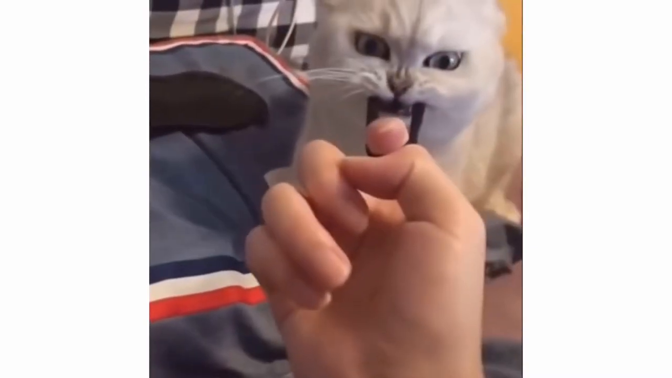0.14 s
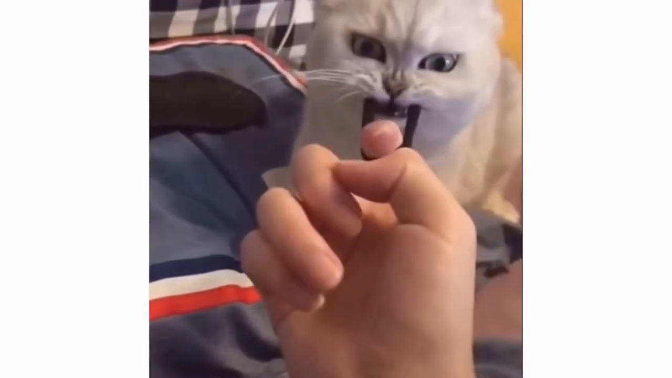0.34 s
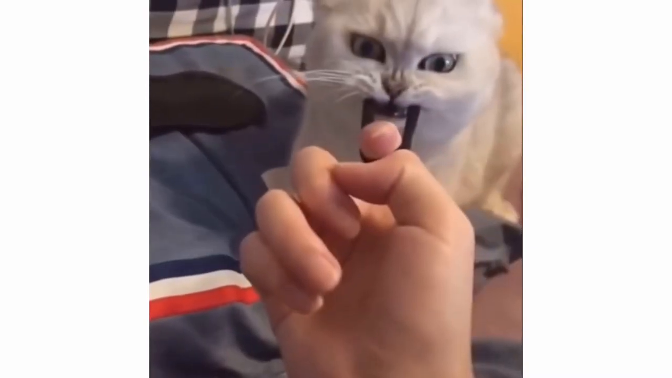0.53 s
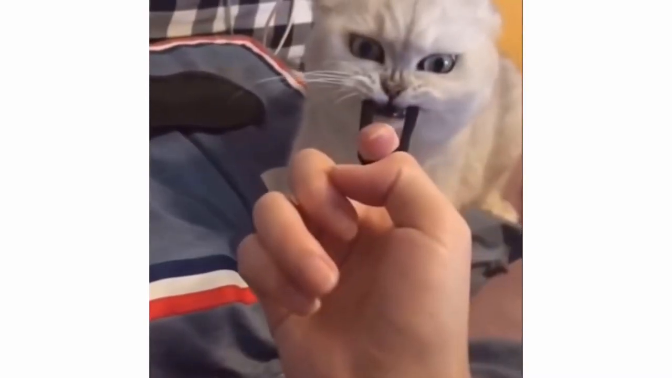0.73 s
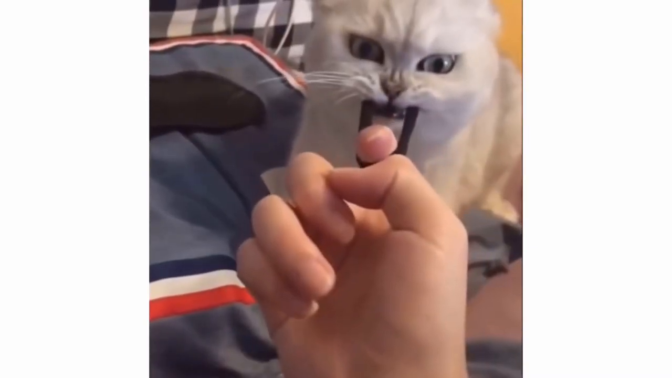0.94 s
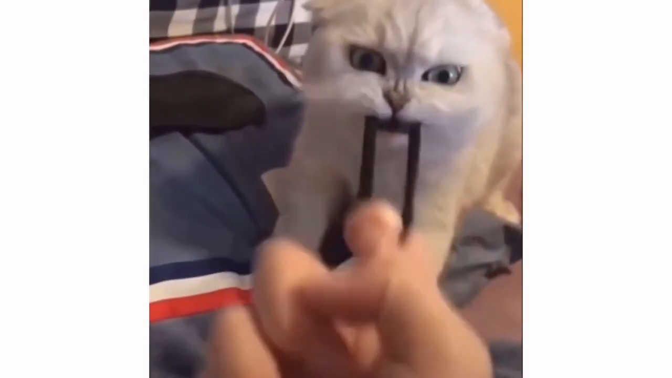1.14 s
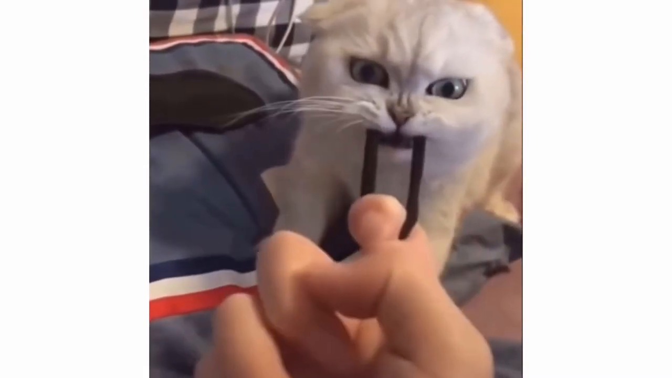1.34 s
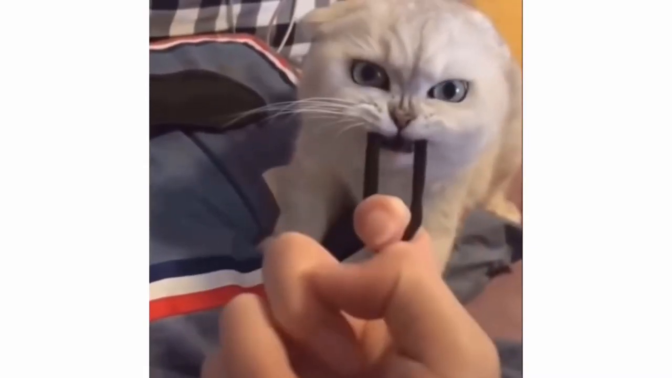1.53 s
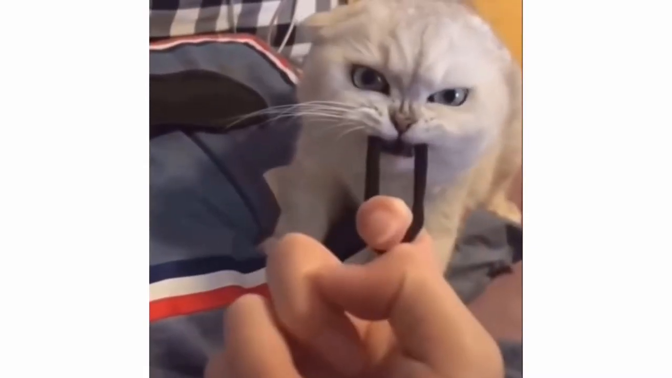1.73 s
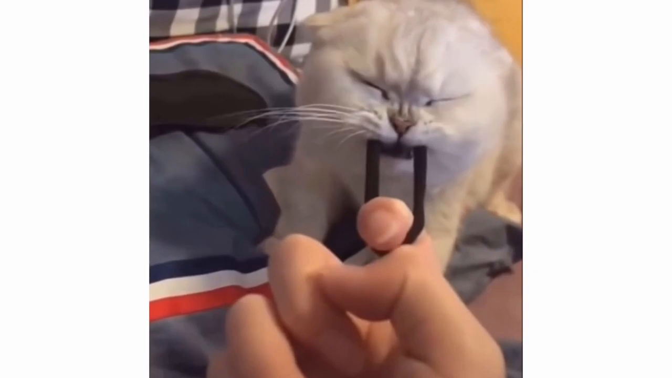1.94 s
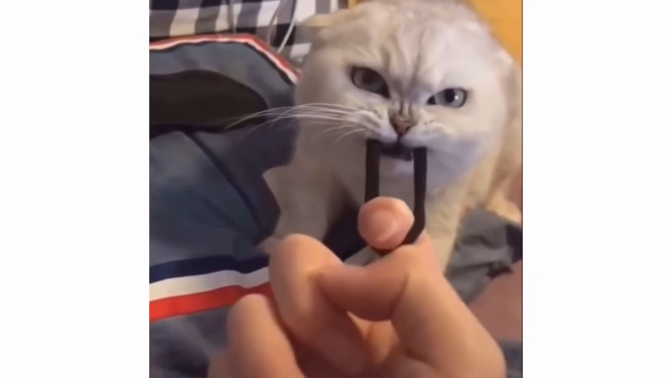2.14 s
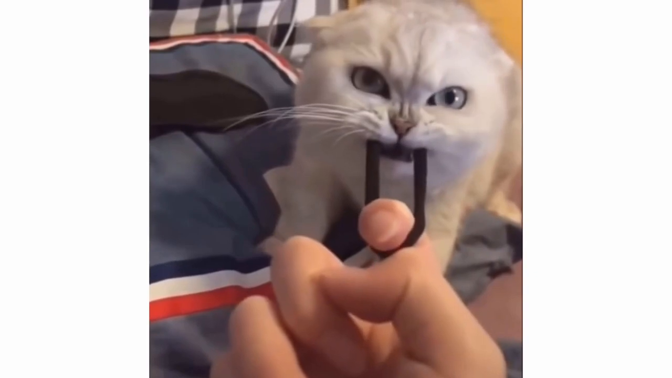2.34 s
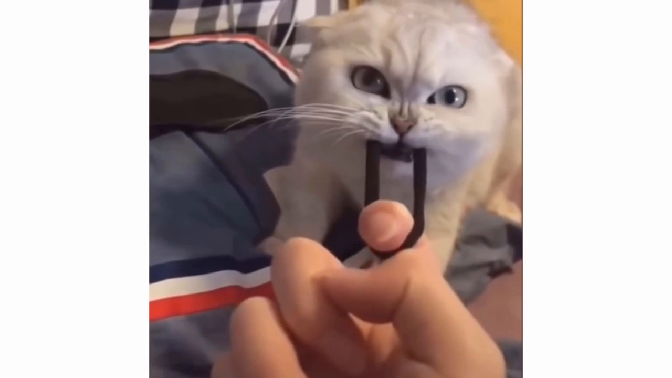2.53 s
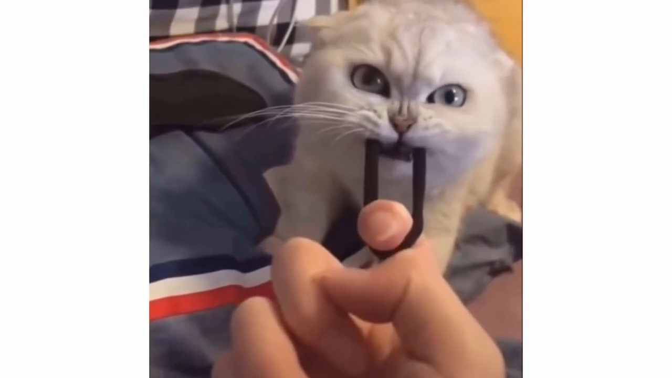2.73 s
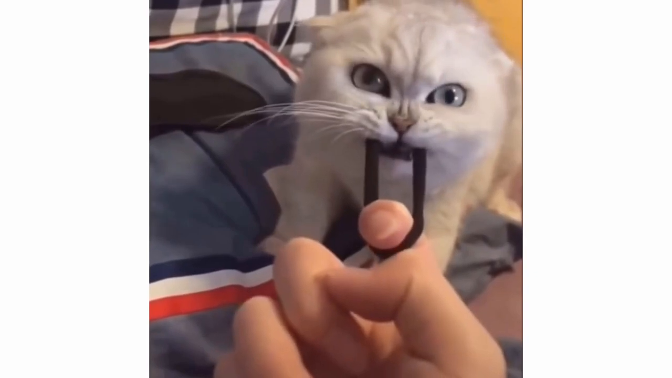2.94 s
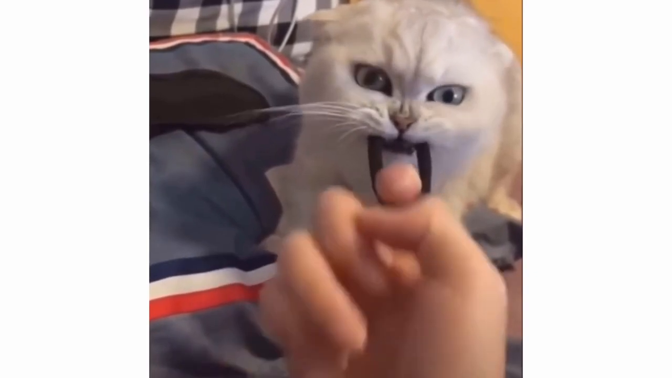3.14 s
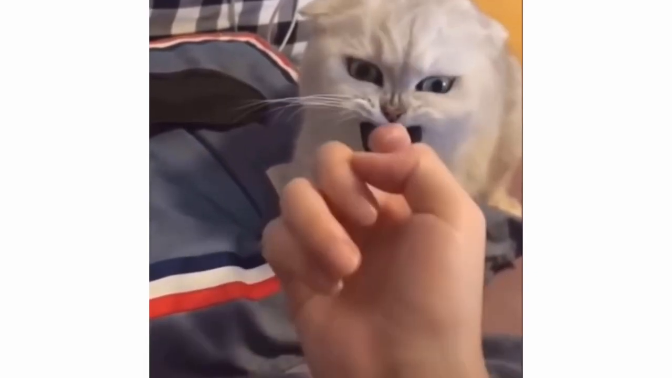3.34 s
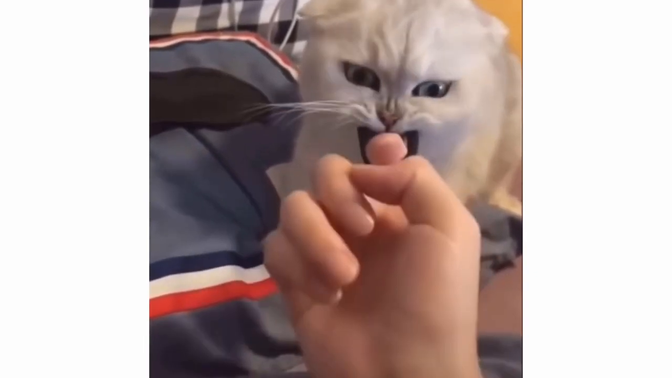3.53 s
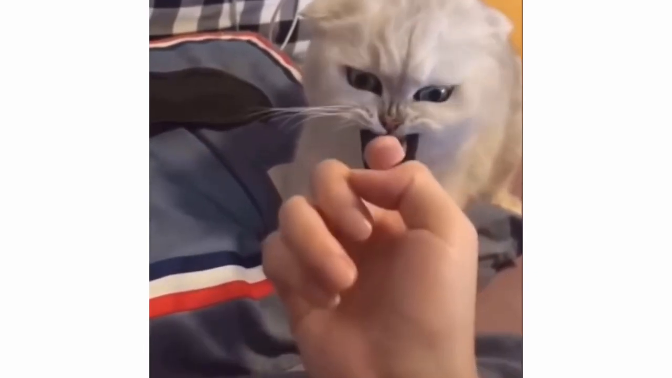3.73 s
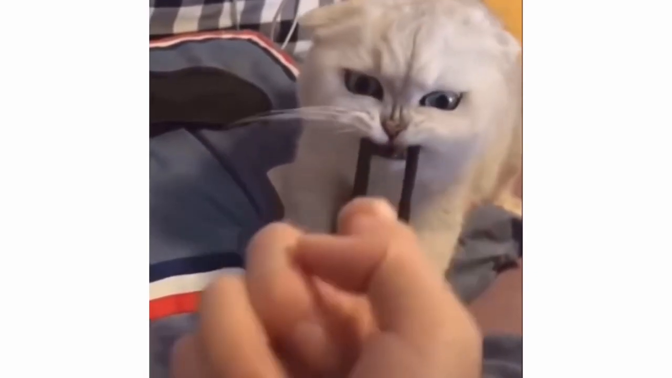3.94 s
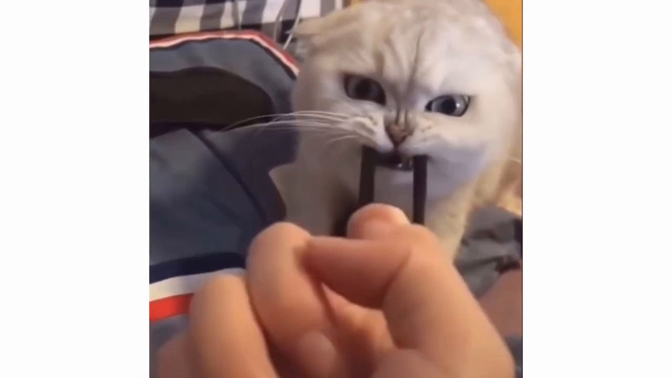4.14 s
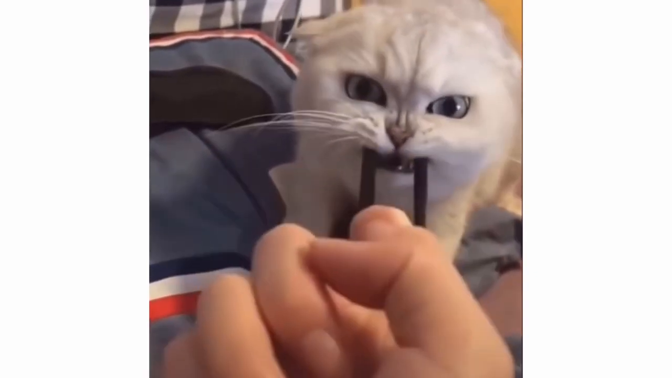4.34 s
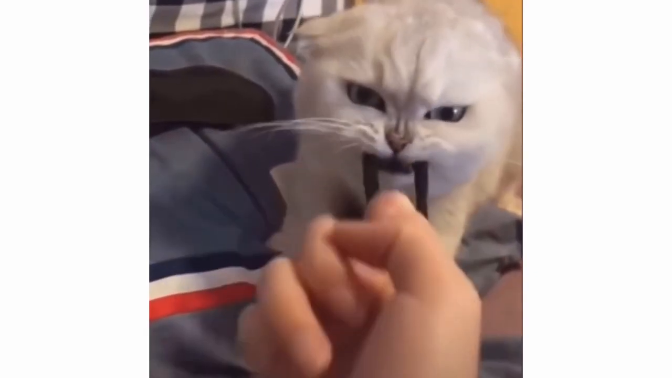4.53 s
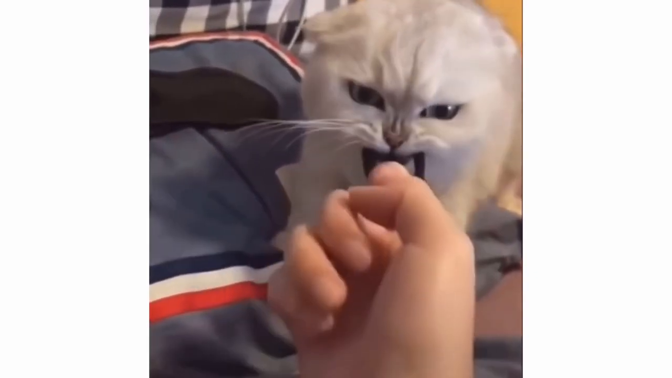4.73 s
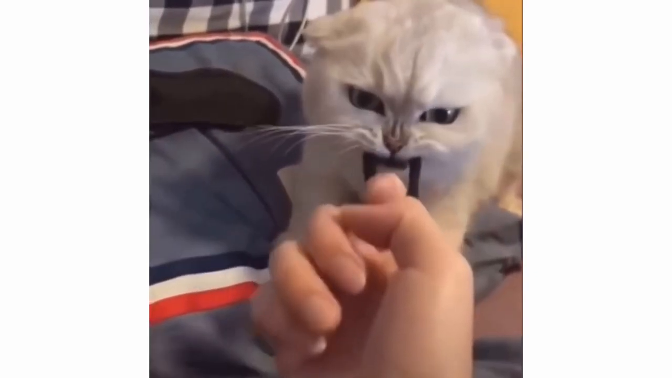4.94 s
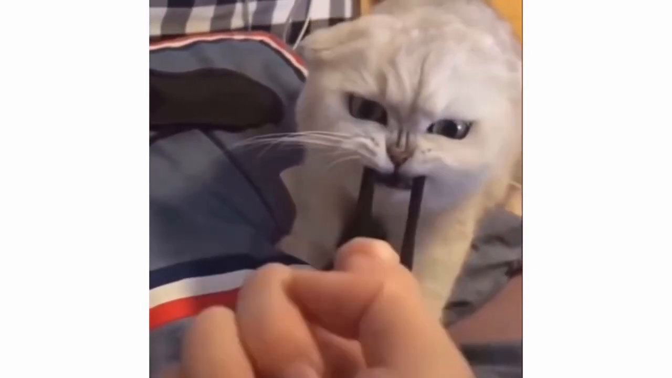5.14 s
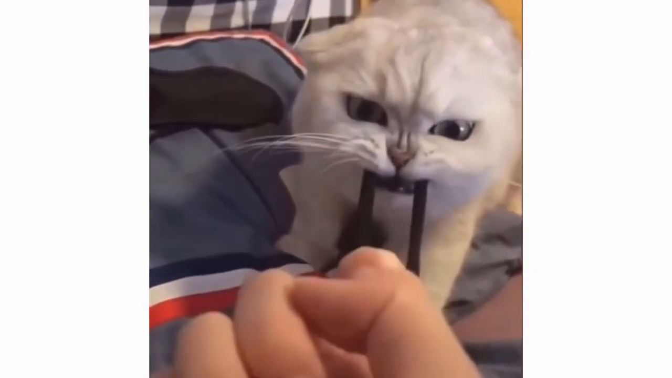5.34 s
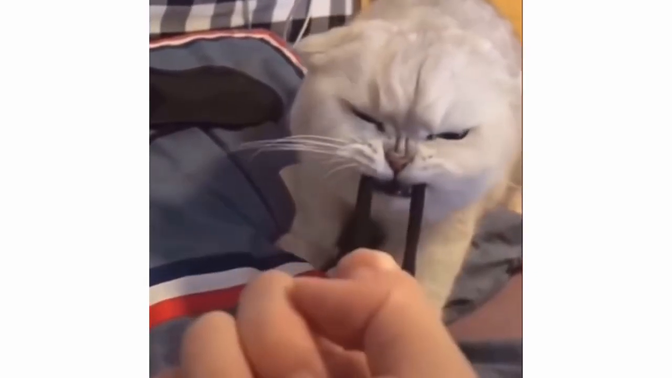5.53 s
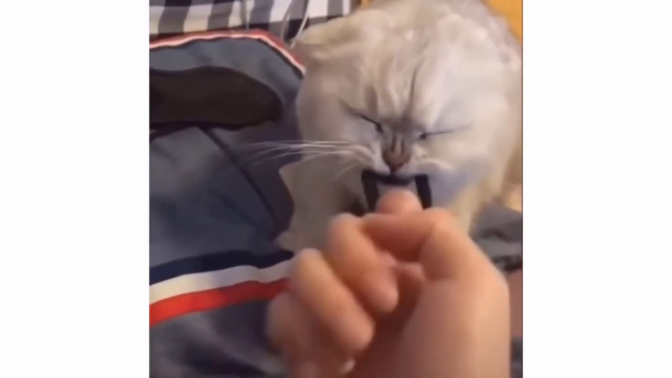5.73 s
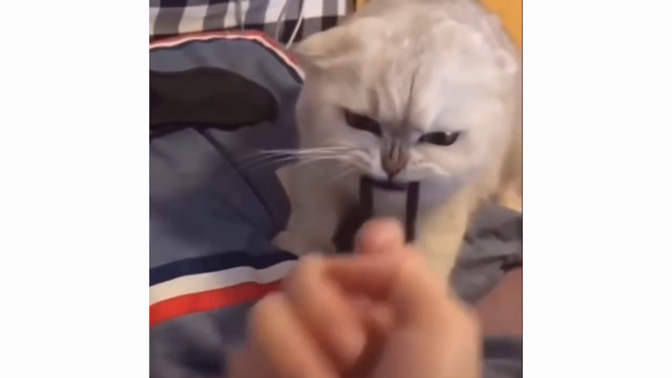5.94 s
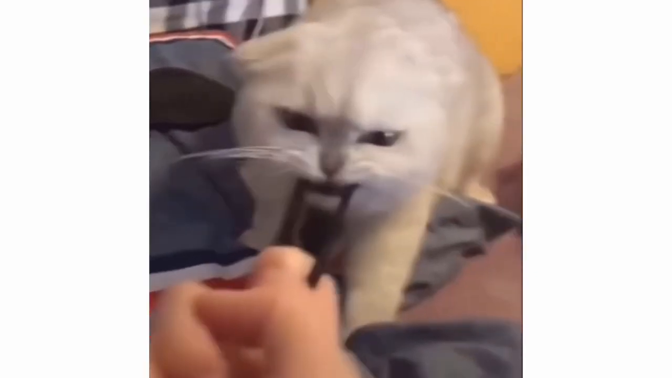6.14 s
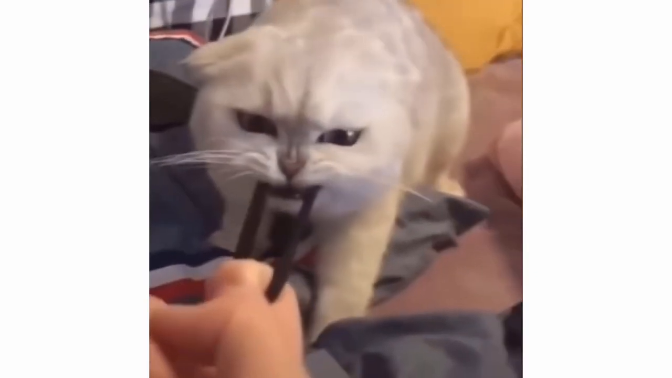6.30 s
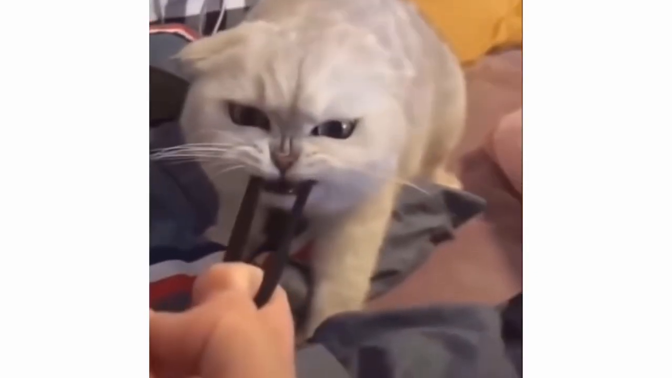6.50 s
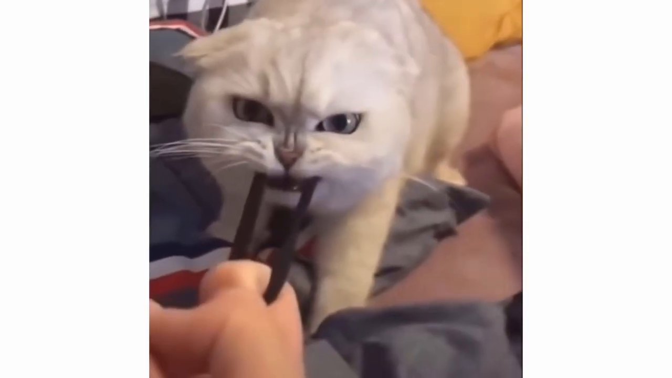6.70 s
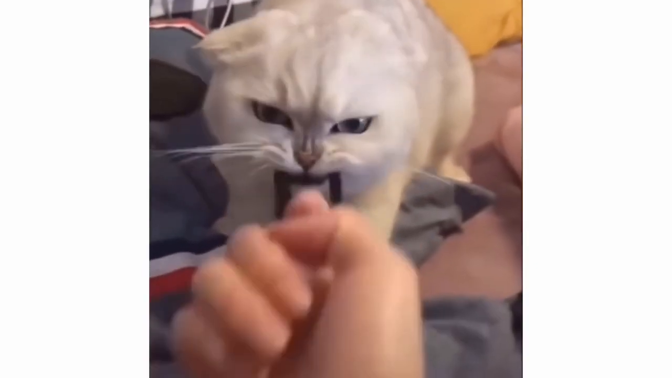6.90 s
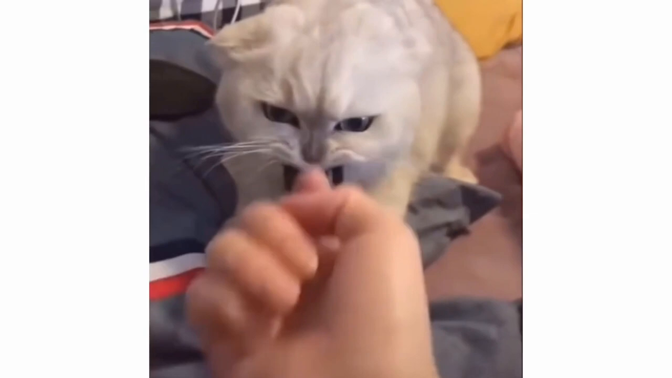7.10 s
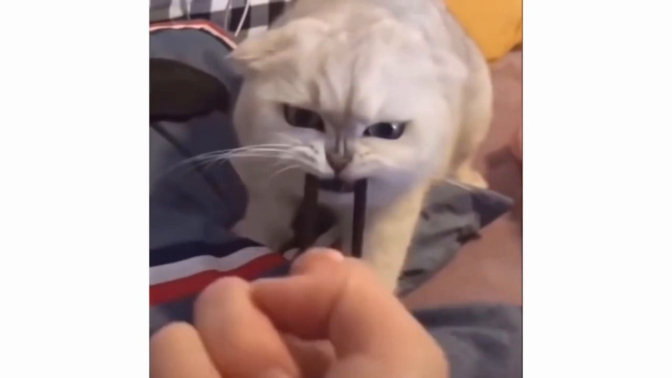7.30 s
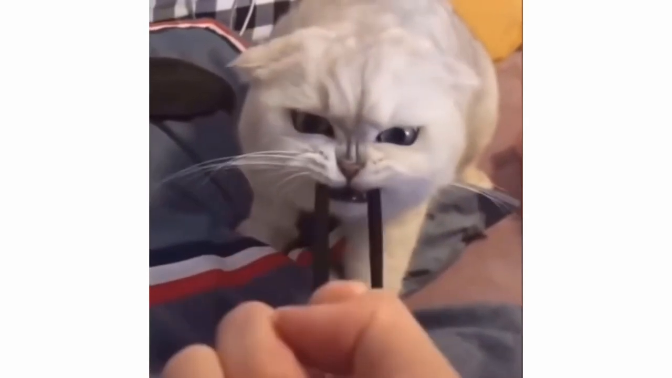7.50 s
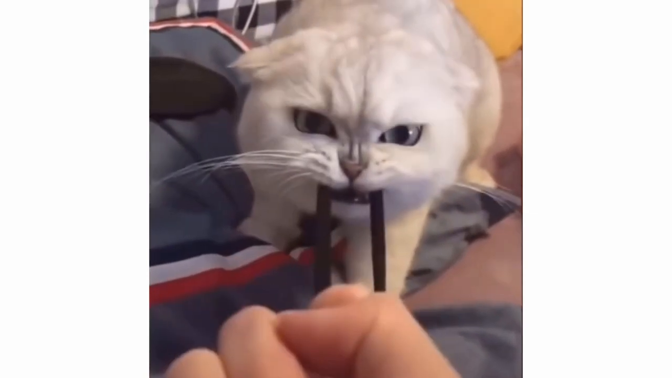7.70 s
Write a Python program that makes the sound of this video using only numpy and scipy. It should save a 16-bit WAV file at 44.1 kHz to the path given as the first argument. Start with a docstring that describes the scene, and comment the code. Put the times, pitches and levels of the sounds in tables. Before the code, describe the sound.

Indoors, a cat with a strap in its teeth gives a short fluttering yowl, then a long angry one sagging into a growl, amid cloth rustles.

```python
"""First cloth rustles over fur and faint whistles glide by, over a rumbling, hissing room: shaped noise and sines.
A cat with a strap between its teeth then gives a short fluttering yowl through a half-closed mouth, and after
a gap a long clear one that sags into a growl and recovers. The voice is a stack of partials coloured by throat,
lips and nose, and has breath noise; a separate high hiss near 12 kHz comes and goes during the yowls.
Rustles and soft thumps, both noise bursts, go with the tugs."""
import sys
import numpy as np
from scipy import signal
from scipy.fft import rfft, irfft, next_fast_len
from scipy.io import wavfile
from scipy.ndimage import map_coordinates

SR = 44100
rng = np.random.default_rng(int(sys.argv[2]) if len(sys.argv) > 2 else 0)


def how_loud(loudness_db):
    """Turn decibels into a plain amplitude multiplier (0 dB gives 1, 20 dB gives 10)."""
    steps = np.asarray(loudness_db, float) / 20
    return 10 ** steps


def output_pcm(signal):
    """Save a mono or channel-first signal as 16-bit PCM at the path in sys.argv[1].

    Samples are clipped to [-1, 1] before scaling.
    """
    pcm = np.clip(np.atleast_2d(signal).T, -1, 1) * 32767
    wavfile.write(sys.argv[1], SR, np.round(pcm).astype(np.int16))


N = 346626  # samples

# In the noise colours below only the shape counts: noise() sets the loudness to 1.
# steady room hiss, noise colour: (f/Hz, level/dB)
ROOM_HISS = [(47, -41), (80, -7.5), (148, -13), (181, -22), (236, -6), (281, -9.5), (350, -11),
             (694, -16.5), (1200, -16), (1370, -18.5), (1470, -21.5), (2230, -25), (3780, -28),
             (15500, -37.5)]
# low room rumble, noise colour: (f/Hz, level/dB)
RUMBLE = [(20, -36), (30, -22), (45, -2.5), (62, 2.5), (68, -3.5), (76, -34), (95, -16.5), (107, -4.5),
          (120, -11), (160, -11), (200, -13), (400, -100.5)]
# narrow whir in the room, noise colour: (f/Hz, level/dB)
WHIR = [(1850, -15), (2000, 1.5), (2130, -3.5), (2250, -47), (3000, -80)]
# cloth on fur, noise colour: (f/Hz, level/dB)
CLOTH = [(150, -2), (250, 1), (399, -1.5), (945, -8), (1200, -5), (1410, -12.5), (3960, -15.5),
         (5700, -21.5), (15500, -30)]
# cloth strokes over fur: (peak t/s, hiss level/dB, rise/s, fall/s)
STROKES = [(.1, -65, 0.06, 0.078), (0.191, -45, .012, 0.011), (.63, -60, 0.03, 0.022),
           (.8, -57, 0.089, 0.15), (1.14, -38.5, 0.057, 0.048), (1.33, -56.5, 0.044, 0.025),
           (2.0, -55, 0.53, 1), (3.03, -61, 0.072, 0.025), (3.248, -41, 0.11, 0.14),
           (3.88, -44, 0.045, 0.072), (3.98, -41, 0.055, 0.038), (4.12, -46.5, 0.099, 0.16),
           (4.699, -45.5, 0.16, 0.18), (5.08, -44.5, .08, 0.049), (5.25, -56.5, 0.11, 0.45),
           (5.8, -47.5, 0.11, 0.071), (6.02, -47, 0.051, 0.087), (6.24, -55, 0.037, 0.022),
           (6.45, -56, 0.22, 0.13), (6.98, -44.5, 0.073, 0.16), (7.25, -44, 0.077, 0.12),
           (7.55, -58, 0.095, 0.15)]
# tugs on the strap: (peak t/s, level/dB, length/s)
THUMPS = [(1.14, -40.5, 0.057), (1.493, -37.5, 0.037), (3.263, -29, 0.006), (3.953, -44, .03),
          (6.053, -38.5, 0.031)]
# soft thump, noise colour: (f/Hz, level/dB)
THUMP_COLOUR = [(50, -69), (80, 1.5), (130, -3.5), (220, 3.5), (400, -17), (1000, -56)]
# faint thin whistles, before their unsteadiness: (start t/s, length/s, start f/Hz, end f/Hz, level/dB)
WHISTLES = [(.45, .11, 1210, 1310, -52), (.68, .33, 1390, 1450, -50), (.52, .17, 2660, 2790, -54),
            (.72, .16, 2820, 2930, -61)]
# high hiss heard during the yowls, before its slow wavering: (t/s, level/dB)
HIGH_HISS = [(1.5, -89), (1.85, -68), (2.7, -70), (2.9, -90), (4.0, -92), (4.15, -59), (4.9, -70),
             (5.2, -61), (5.7, -61), (5.95, -67), (6.15, -58), (6.8, -69), (7.3, -66)]
# the same hiss, noise colour: (f/Hz, level/dB)
HIGH_HISS_COLOUR = [(9000, -42), (10700, -33), (11000, 3), (12500, 8), (14000, -1), (15500, -27)]

# both yowls, before catches and roughness:
# (t/s, pitch f/Hz, fundamental level/dB, second partial level/dB, upper partials together level/dB)
SHORT_YOWL = [(1.44, 335.5, -73, -80, -81), (1.46, 322.3, -32, -37, -37), (1.52, 410, -31, -44, -48),
              (1.575, 450.6, -36, -53, -54), (1.6, 594.9, -37, -39.5, -59), (1.635, 620, -38, -33.5, -65),
              (1.665, 477, -28.5, -39, -46), (1.685, 351, -30, -36, -39.5), (1.73, 423.6, -26.5, -38, -41),
              (1.755, 395, -26.5, -45, -41), (1.82, 479.4, -28.5, -36, -45.5),
              (1.875, 394.5, -25.5, -46, -38.5), (1.95, 474.4, -25, -31, -40.5),
              (1.98, 403.3, -25, -43, -35), (2.02, 400, -24, -39, -37.5),
              (2.11, 478.6, -28.5, -35.5, -45.5), (2.165, 407, -23.5, -45, -37),
              (2.19, 466, -26.5, -31, -46), (2.215, 426.6, -23, -46, -37), (2.255, 462.4, -27.5, -33, -49),
              (2.36, 426.6, -24, -43, -37.5), (2.48, 385, -27, -41.5, -39.7), (2.6, 376.6, -26.5, -44, -40),
              (2.75, 388, -28.5, -44, -40), (2.83, 408.5, -46, -54, -46), (2.86, 420, -79, -72, -83)]
LONG_YOWL = [(3.96, 183.5, -57, -60, -56), (3.977, 195.6, -27, -25.5, -30), (4.0, 273, -24, -32, -37.5),
             (4.024, 251, -34, -36.5, -39), (4.064, 387.2, -24, -30.5, -35),
             (4.141, 350.8, -25.5, -30, -27), (4.23, 393.1, -23, -34, -35), (4.37, 414.4, -21.5, -41, -35),
             (4.531, 399.2, -22.5, -40.5, -33), (4.71, 407.7, -23.5, -41, -36.5),
             (4.93, 387.2, -23.5, -35, -34.5), (5.06, 357.6, -23.5, -34, -32.5),
             (5.25, 345, -23, -31, -31.5), (5.39, 353, -23, -31.5, -31.5), (5.71, 360, -23.5, -32.5, -31),
             (6.1, 308.2, -23, -32, -32.5), (6.28, 319.3, -22.5, -31.5, -31),
             (6.689, 329.5, -23, -32.5, -30.5), (6.8, 324, -23.5, -34.5, -30),
             (6.912, 338.6, -24, -34.5, -31.5), (7.07, 311.7, -25.5, -39.5, -34.5),
             (7.169, 254.7, -24.5, -28.5, -34), (7.21, 277, -24, -35.5, -37.5),
             (7.272, 222.2, -24, -28.5, -39), (7.348, 162.3, -24, -24, -37), (7.398, 196.6, -22, -25, -39),
             (7.5, 220.3, -20.5, -26.5, -34), (7.596, 260.7, -24.5, -30.5, -36),
             (7.776, 300, -25, -37.5, -30.5), (7.86, 293.4, -23.5, -39, -31)]
# how unevenly the folds close, before catches add to it: (t/s, roughness 0-1)
ROUGH = [(1.44, .95), (1.58, .8), (1.61, .45), (1.66, .7), (1.75, .6), (1.85, .22), (2.7, .17), (2.85, .35),
         (3.96, .8), (4.04, .55), (4.07, .12), (4.19, .13), (4.22, .02), (4.7, .02), (4.85, .07),
         (5.0, .06), (5.04, .02), (7.09, .03), (7.12, .4), (7.19, .3), (7.23, .6), (7.27, .75), (7.33, .55),
         (7.49, .65), (7.52, .08), (7.86, .02)]
# how far the mouth is open: (t/s, opening 0-1)
MOUTH = [(1.4, .3), (1.9, .1), (2.4, .36), (2.9, .8), (3.96, 1), (4.03, .45), (4.13, .68), (4.19, .6),
         (4.21, 0), (5.8, 0), (6.3, .35), (6.6, .35), (6.8, .1), (7.86, .05)]
# boost of the two nose resonances: (t/s, lower level/dB, upper level/dB)
NOSE = [(1.4, -3.5, 0), (1.9, 16, 0), (2.4, 12, 0), (3.96, 5, 0), (4.1, 20, 0), (4.4, 12, 0), (4.6, 0, 0),
        (5.0, 0, 16), (5.3, 15, 16), (5.65, 16, 16), (5.8, 4, 17), (6.05, 18, 15), (6.6, 18, 15),
        (6.8, 4, 14), (7.3, 6, 5), (7.6, 12, 12), (7.86, 0, 14)]
# throat and nose with the teeth shut, gain for each partial: (f/Hz, level/dB)
THROAT = [(300, -6), (600, 6.5), (720, 1.5), (785, -12), (860, 4.5), (950, -0.5), (1350, -2), (1500, -13.5),
          (1750, -25), (2400, -38), (4000, -43), (9000, -55), (12000, -86), (15000, -66), (17000, -120)]
# air streaming past the teeth, noise colour: (f/Hz, level/dB)
BREATH = [(200, -24), (400, -11), (1300, -7), (1800, -16.5), (3000, -26), (4600, -26), (6000, -23),
          (10000, -47), (15500, -53)]
# breath in the nose, noise colour: (f/Hz, level/dB)
NOSE_BREATH = [(4200, -47), (4500, 4), (4750, -2), (5100, -43)]
# bouts of evenly spaced catches, before scatter: (first t/s, last t/s, first dip/dB, last dip/dB, width/ms)
FLUTTERS = [(1.45, 1.641, -34, -18, 12.1), (1.677, 2.097, -10, -5.5, 7.74), (2.144, 2.413, -2, -2, 7.2),
            (2.447, 2.823, -8, -12.5, 6.5), (4.82, 4.989, -6, -11, 8.5)]
# catches a second in each bout, before rounding to a whole number of catches: (f/Hz)
FLUTTER_RATES = [36, 31, 29.7, 32, 30]
# single catches, before scatter: (t/s, dip/dB, width/ms)
CATCHES = [(4.721, -3.5, 10.1), (5.72, -2.5, 5), (5.91, -2.5, 6.7), (6.895, -5.5, 10), (6.935, -3.5, 7.64),
           (7.074, -3, 12.1), (7.11, -2.5, 5), (7.59, -0.5, 4)]
# resonances: (f/Hz, width/Hz); the mouth opening moves and stretches that of the lips
LIPS, NOSE_LOW, NOSE_HIGH = (3000, 1100), (4500, 260), (7250, 230)

ROOM_T60 = .3  # s, time for the echo to fall by 60 dB
SOFTEST_S = .015  # no stroke starts or stops faster
STIR_DB = -59.5  # cloth never lies quite still
EARLY_LATE_S = .002  # scatter of the moment of a catch
UNEVEN = .38  # scatter of dip and width from catch to catch, in natural-log units


def unit(x):
    """Scales a sound to rms 1."""
    return x / np.sqrt(np.mean(x ** 2))


def along(points, hz):
    """Reads (Hz, value) points on a log frequency axis."""
    f, v = np.transpose(points)
    return np.interp(np.log(hz + 1), np.log(f + 1), v)


def curves(rows):
    """Gives one value per sample for each column after the time."""
    s, *cols = np.transpose(rows)
    return [np.interp(np.arange(N) / SR, s, c) for c in cols]


def wobble(steps):
    """A smooth random curve with one knot at each whole number of steps."""
    return map_coordinates(rng.standard_normal(4000), [steps])


def slow(rate):
    """A smooth random curve, rate knots a second."""
    return wobble(np.arange(N) * rate / SR)


def noise(spectrum):
    """Noise of rms 1 with the given colour."""
    m = next_fast_len(N + SR // 4)
    gain = how_loud(along(spectrum, np.fft.rfftfreq(m, 1 / SR)))
    return unit(irfft(rfft(rng.standard_normal(m)) * gain, m)[:N])


def room_tone():
    """A low wavering rumble over steady hiss, with a faint narrow whir, all coloured noise."""
    whir = how_loud(-63.0 + slow(5.4)) * noise(WHIR)
    rumble = how_loud(-45.0 + 1.5 * slow(3.08)) * noise(RUMBLE)
    hiss = how_loud(-49.0 + 0.2 * slow(3.18)) * noise(ROOM_HISS)
    return whir + rumble + hiss


def room(x):
    """A small soft room answers: an echo of fading noise."""
    t = np.arange(SR // 2) / SR
    tail = rng.standard_normal(len(t)) * how_loud(-60 * t / ROOM_T60) * (t > .004)
    return signal.fftconvolve(x, tail / np.linalg.norm(tail))[:N]


def rustle():
    """Cloth dragged over fur: grainy hiss that swells with each stroke, and soft thumps at the tugs."""
    t = np.arange(N) / SR
    strokes = how_loud(STIR_DB)
    for s, db, rise, fall in STROKES:
        length = np.maximum(np.where(t < s, rise, fall), SOFTEST_S)
        strokes = strokes + how_loud(db) * np.exp(-((t - s) / length) ** 2)
    grain = how_loud(1.68 * slow(60) + 0.9 * slow(400))
    hiss = strokes * grain * noise(CLOTH)
    pushes = sum(how_loud(db) * np.exp(-((t - s) / length) ** 2) for s, db, length in THUMPS)
    return hiss + pushes * noise(THUMP_COLOUR)


def whistles():
    """Thin unsteady sine tones that swell, glide and fade."""
    t = np.arange(N) / SR

    def line(s, length, start_hz, end_hz, db):
        """One whistle; u runs from 0 to 1 along it."""
        u = np.clip((t - s) / length, 0, 1)
        hz = (start_hz + (end_hz - start_hz) * u) * (1 + 0.008 * slow(48.3))
        swell = how_loud(db + 4.0 * slow(36.2)) * np.sin(np.pi * u) ** 2
        return swell * np.sin(2 * np.pi * np.cumsum(hz) / SR)

    return sum(line(*w) for w in WHISTLES)


def high_hiss():
    """High hiss near 12 kHz that comes and goes during the yowls: coloured noise."""
    return how_loud(curves(HIGH_HISS)[0] + slow(6)) * noise(HIGH_HISS_COLOUR)


def flutter():
    """The throat catches: each catch dips the level and slackens the folds."""
    bouts = []
    for (a, b, first, last, w), rate in zip(FLUTTERS, FLUTTER_RATES):
        bouts.append(np.linspace((a, first, w), (b, last, w), round((b - a) * rate) + 1))
    rows = np.vstack(bouts + [CATCHES])
    s, dip_db, width_ms = rows[np.argsort(rows[:, 0])].T
    luck = rng.standard_normal((len(s), 3))
    s = s + EARLY_LATE_S * luck[:, 0]
    dip_db = dip_db * np.exp(UNEVEN * luck[:, 1])
    width_ms = width_ms * np.exp(UNEVEN * luck[:, 2])
    t = np.arange(N) / SR

    def shape(c, w, late):
        """A lopsided bump at c; late stretches its second half."""
        return np.exp(-np.abs((t - c) / (w / 1000 * np.where(t > c, late, .55))) ** 1.6)

    dips, slack = 0, 0
    for c, d, w in zip(s, dip_db, width_ms):
        dips = dips + d * shape(c, w, 0.21)
        slack = slack + np.minimum(np.abs(d), 9) ** .7 * shape(c, w, .7)  # tension returns slowly
    return dips, slack


def throat(hz, mouth, low_db, high_db):
    """Gain of throat, lips and nose; the wider the lips part, the lower the band they pass."""
    def bump(f, mode):
        return np.exp(-((f - mode[0]) / mode[1]) ** 2)

    lips_db = 26.0 * mouth * bump(hz * (0.62 + 0.93 * mouth), LIPS)
    nose_db = low_db * bump(hz, NOSE_LOW) + high_db * bump(hz, NOSE_HIGH)
    return how_loud(along(THROAT, hz) + lips_db + nose_db)


def cat():
    """Vocal folds: a stack of partials coloured by the throat, plus breath noise that swells slightly once a cycle."""
    silence = [(3.955, LONG_YOWL[0][1], -70, -75, -75)]  # keeps the gap between the yowls quiet
    smooth_hz, first_db, second_db, upper_db = curves(SHORT_YOWL + silence + LONG_YOWL)
    (rough,), (mouth,), (low_db, high_db) = curves(ROUGH), curves(MOUTH), curves(NOSE)
    dips, slack = flutter()
    loose = slack * np.clip(.4 + 4 * rough, 0, 1)  # a clear, taut voice yields less to a catch
    waver = .0016 * slow(40)
    hz = smooth_hz * (1 - .05 * loose) * (1 + waver)  # pitch sags in a catch
    rough = np.minimum(rough + .07 * slack, 1)  # and the folds close less evenly
    cycles = np.cumsum(hz) / SR

    def chance():
        """No two closures alike: a random curve, one knot a cycle."""
        return rough * np.tanh(wobble(cycles))

    size_db = dips + 1.8 * chance() + .2 * wobble(cycles) + .4 * slow(25)
    phase = 2 * np.pi * (cycles + .05 * chance())
    # the sharp closure that makes the overtones comes early or late, and shifts with pitch
    snap = phase + 2 * np.pi * 0.14 * chance() + 0.0149 * (smooth_hz - 328)

    at = np.arange(0, N, 32)  # the throat is worked out at every 32nd sample
    setting = mouth[at], low_db[at], high_db[at]
    upper = np.arange(3, 46)  # partial numbers
    total = np.sqrt(sum(throat(k * smooth_hz[at], *setting) ** 2 for k in upper))

    def share(k):
        """Part of the upper level that goes to partial k."""
        return np.interp(np.arange(N), at, throat(k * hz[at], *setting) / total)

    first = how_loud(first_db) * np.cos(phase)
    second = how_loud(second_db) * np.cos(2 * snap + 3.11)
    # strong and weak cycles alternate: partials halfway between the others
    between = .8 * np.cos(1.5 * phase) + .45 * np.cos(2.5 * phase)
    halfway = how_loud(second_db) * rough * np.tanh(2 * wobble(cycles / 5)) * between
    overtones = how_loud(upper_db) * sum(share(k) * np.cos(k * snap + 2.7 - .02 * k * k) for k in upper)
    bright_db = 3.2 * chance() - 2.4 * loose + .9 * (slack - loose)
    tone = first + how_loud(bright_db) * (second + halfway + overtones)

    sway = 1 + 0.18 * np.cos(phase)  # slightly more breath once a cycle
    breath = how_loud(first_db - 30 + 7 * rough + 8 * mouth) * sway * noise(BREATH)
    nose_breath = how_loud(first_db - 59.5 + low_db + 11 * rough) * noise(NOSE_BREATH)
    return how_loud(size_db) * np.sqrt(2) * tone + how_loud(dips) * (breath + nose_breath)


def scene():
    """Cat and high hiss in the room, with whistles, rustle and room tone."""
    near = cat() + high_hiss()
    echo = how_loud(-22) * room(near)
    return (near + echo + whistles() + rustle() + room_tone())[None]


def roll_off(x):
    """The treble ends steeply here."""
    return signal.sosfilt(signal.butter(12, 15660, fs=SR, output="sos"), x)


def record(dry):
    """Turns the finished mix into the sound that is saved."""
    return roll_off(dry)


dry = scene()
out = record(dry)
output_pcm(out)
```